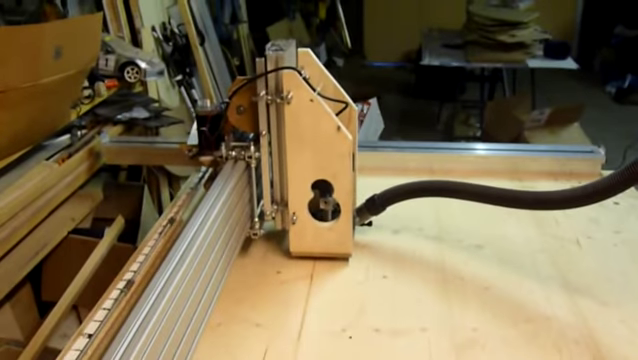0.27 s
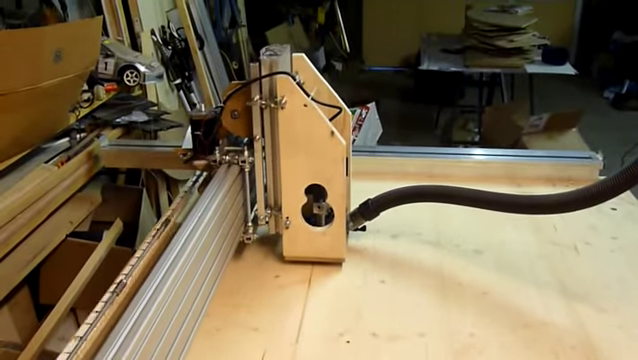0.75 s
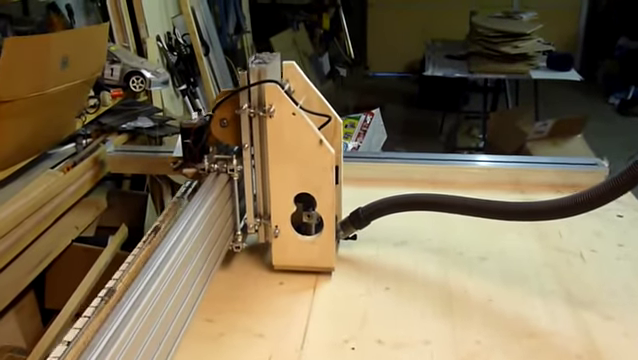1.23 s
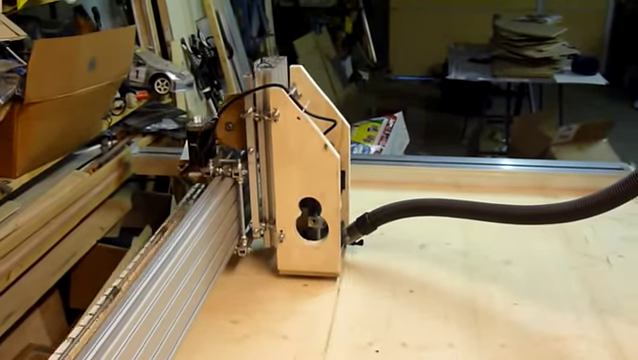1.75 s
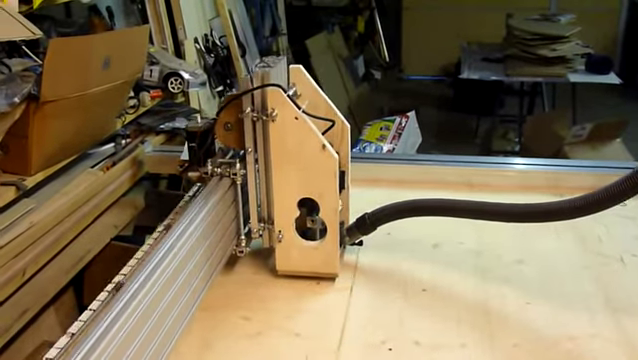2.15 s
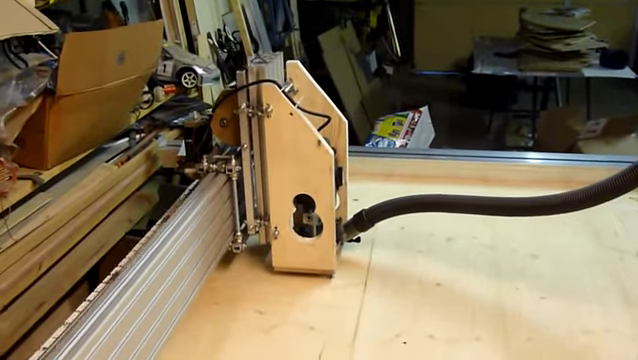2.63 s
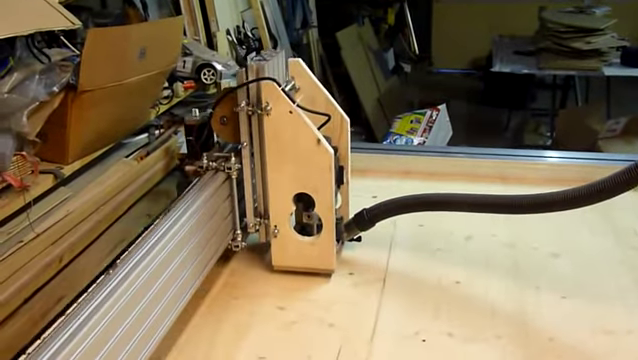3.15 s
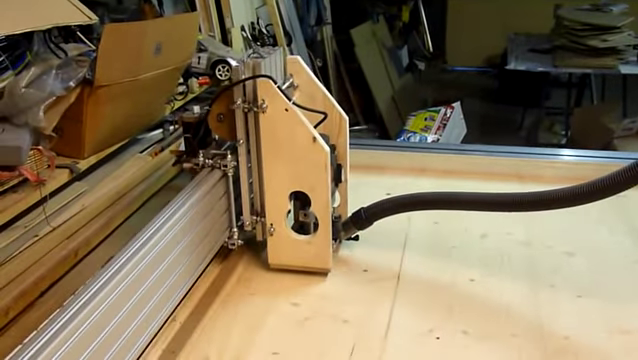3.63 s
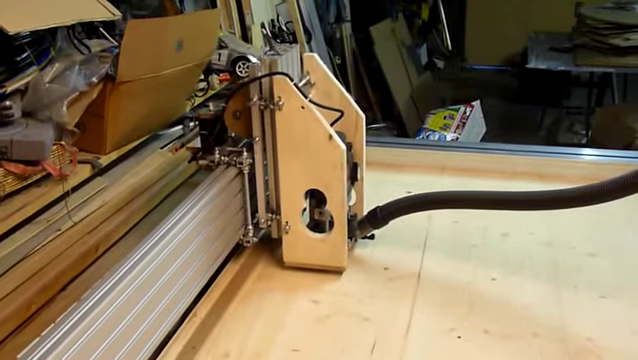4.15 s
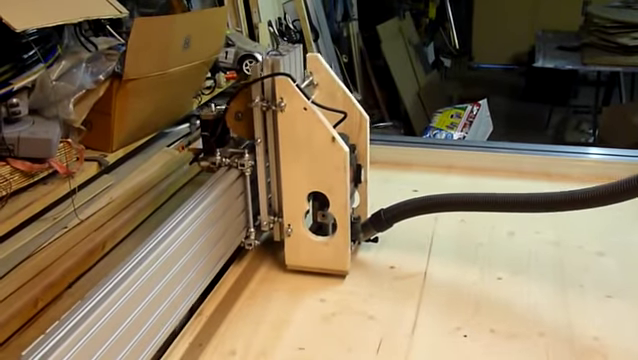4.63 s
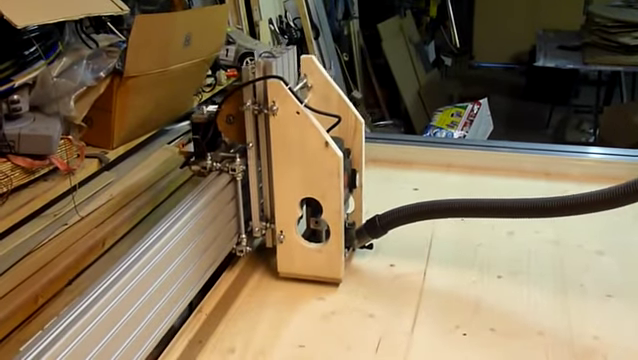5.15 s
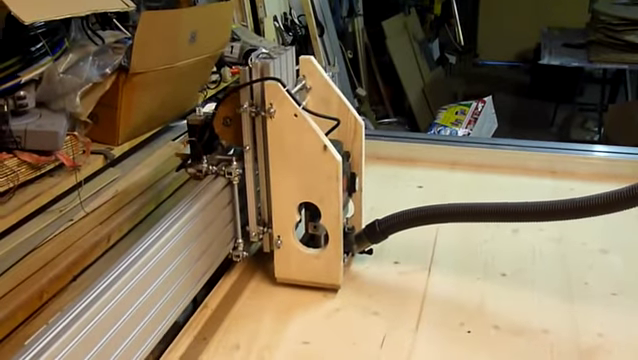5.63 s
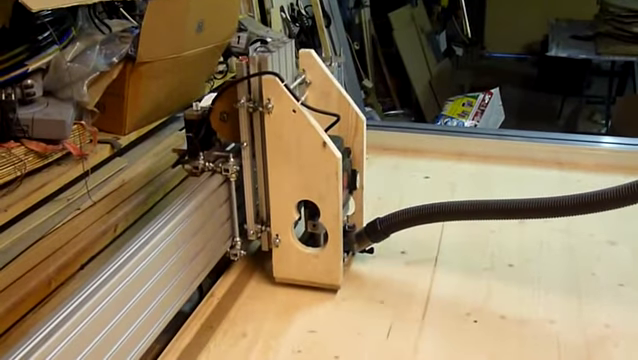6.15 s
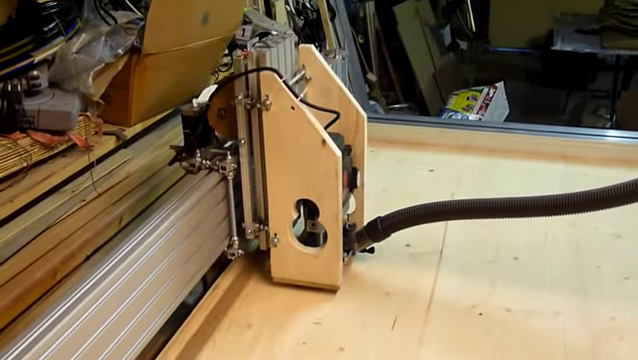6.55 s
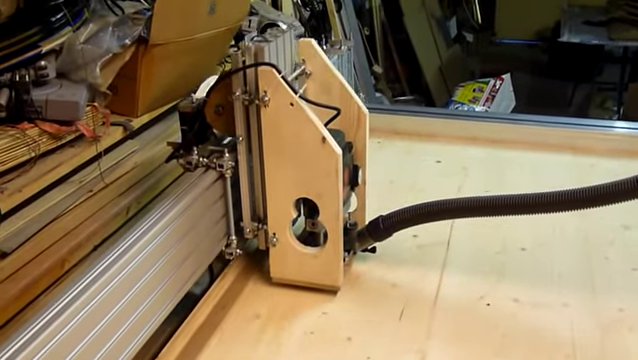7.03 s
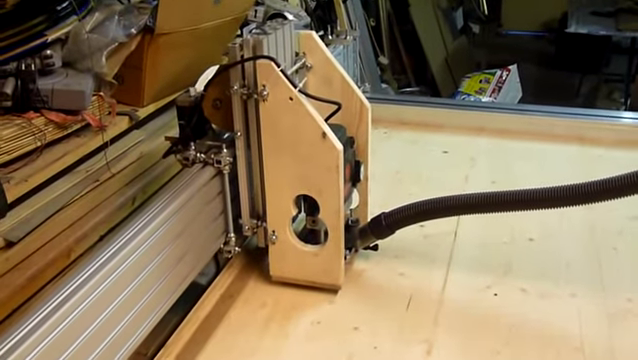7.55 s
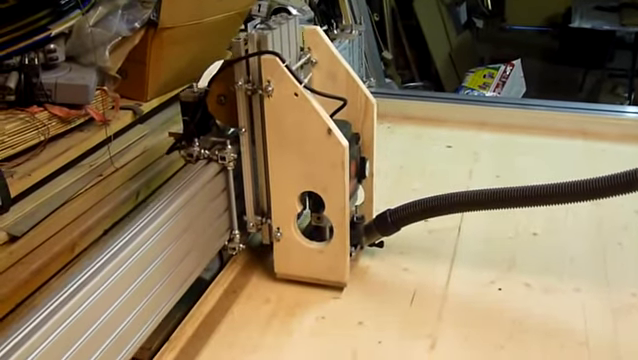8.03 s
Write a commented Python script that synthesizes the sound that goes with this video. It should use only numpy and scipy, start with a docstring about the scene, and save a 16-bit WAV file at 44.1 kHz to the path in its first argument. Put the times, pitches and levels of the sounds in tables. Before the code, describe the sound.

A close, mechanical sound from microphones riding on a wooden router machine, with only a faint workshop echo. It opens with a judder and a motor whine already slowing, sliding from about 350 Hz to a low growl by 0.5 s. The motor reverses and swoops up, shuddering the frame near 0.96 s, then holds a strong steady whine around 355 Hz until 3.7 s over grainy roller rumble and hiss. Dry hose ticks snap irregularly from 0.2 to 3.7 s. Another judder, and the pitch drops to a growl at 4.1 s. A second motor climbs, judders at 4.57 s, and holds around 377 Hz, thinner and buzzier with overtones; harder knocks land near 4.6, 5.3, 5.5, 6.8 and 7.4 s. It judders and slides down to 7.87 s, then the first motor rises again until the cut near 8.3 s.

```python
"""Two stepper motors take turns driving a wooden router gantry along its rails in a small workshop.
Each whine is a sine at the step rate with multiples, gliding on ramps and steady at full speed.
Rollers rumble as noise jolted once a step, the frame rings and judders, and a dragged hose ticks as noise bursts.
The microphone pair rides on the machine behind a housing that notches the treble; the room answers faintly."""
import sys
import numpy as np
from scipy import signal
from scipy.fft import rfft, irfft, next_fast_len
from scipy.io import wavfile
from scipy.ndimage import map_coordinates

SR = 44100
rng = np.random.default_rng(int(sys.argv[2]) if len(sys.argv) > 2 else 0)


def convert_level_to_amplitude(level_db):
    """Map a level in decibels to its linear amplitude factor."""
    exponent = np.asarray(level_db, float) / 20
    return 10 ** exponent


def inscribe(sig):
    """Save sig as 16-bit PCM at rate SR to the path in sys.argv[1].

    A 1-D sig is mono; a 2-D sig holds one channel per row.
    Samples are clipped to [-1, 1] before scaling.
    """
    pcm = np.round(np.clip(np.atleast_2d(sig).T, -1, 1) * 32767)
    wavfile.write(sys.argv[1], SR, pcm.astype(np.int16))


N = 365148

# moves in turn, long motor except the third: start_s, stop_s, period_change_ms_per_s (on a ramp), ramp_offset_db
MOVES = [(0, .525, 25.1, -4), (.53, 4.125, 27.1, -0.3), (4.13, 7.867, 24.4, 1.7), (7.868, 8.28, 25.5, -3.8)]
# full speed in each move: time_s, step_rate_hz, step_tone_db, drive_train_db, rattle_db
STOPPING_CRUISE = [(0, 354.5, -22.5, -41, 6), (.04, 353.4, -26.5, -47.5, 7.5)]
LONG_CRUISE = [(.974, 351.4, -17, -55, 5.2), (1.03, 352, -14, -56, -0.5), (1.6, 353.6, -14.5, -53.5, -2),
               (2.249, 355.8, -15, -54.5, -2.5), (2.67, 356.5, -18, -49, 2), (2.76, 355.1, -19, -55, 0.5),
               (3.04, 354.6, -21, -55, 4), (3.5, 354.7, -20.5, -55.5, 2.3),
               (3.674, 353.8, -23, -50.5, -1.7)]
CROSS_CRUISE = [(4.588, 374.2, -32, -38.5, -1.8), (4.831, 377.7, -29, -43.5, -1.5),
                (5.3, 377.7, -28, -44.5, -0.78), (5.49, 374.8, -29, -54, -0.053),
                (5.61, 379.6, -26, -41, 0.69), (6.021, 376, -28, -49.5, 0.1),
                (6.201, 376.7, -25.5, -40.5, 0.52), (7.397, 379.2, -26.5, -42, 0.97)]
STARTING_CRUISE = [(8.345, 354, -20, -54, 0.1), (8.4, 354, -20, -54, 0.1)]
# motor loudness on a ramp, before the move's offset:
# step_rate_hz, speeding_up_tone_db, braking_tone_db, drive_train_db
LONG_RAMP = [(65, -60, -68, -51), (81.6, -78, -71, -61.5), (101, -53, -53, -58), (127, -55.5, -58, -58.5),
             (168, -39, -43.5, -60), (212, -29, -33.5, -56), (265, -44, -30, -48.5),
             (304, -32.5, -18.5, -47.5), (330, -29.5, -18.5, -53.5)]
CROSS_RAMP = [(71.6, -72, -65, -46), (97, -86, -76, -47), (128, -61, -67, -50), (158, -62, -60, -44.5),
              (203, -58, -45, -48), (233, -34.5, -39, -37), (272, -26, -24.5, -43),
              (310, -30, -17.5, -35.5), (342, -16.5, -25, -35.5)]
# drive-train tones of gear teeth and rollers: step_rate_multiple, relative_level_db
STOPPING_GEARS = [(2, 9.5), (3, -20), (4, 6.5)]
LONG_GEARS = [(.46, 1.5), (.5, -1), (0.751, -7), (1.75, -6), (2, 5), (2.5, -13), (3, -0.5), (3.998, -9.5)]
CROSS_GEARS = [(2.935, 0), (5.87, -3), (8.8, -7)]
STARTING_GEARS = [(2, 3.5), (3, 6), (4, 3)]
# overtones of the step tone in the cross move, before the frame: step_rate_multiple, level_re_tone_db
STEP_OVERTONES = [(.5, -38.5), (1.5, -26.5), (2, -9.5), (3, -25.5), (4, -32.5), (5, -30.5), (5.5, -48),
                  (6, -34.5), (7, -44.5), (8, -40.5), (9, -39), (10, -44.5), (11, -49), (13, -47),
                  (15, -42.5)]
# high whistles at multiples of the step rate, one list a move, before the frame:
# step_rate_multiple, level_at_80_steps_per_s_db
WHISTLES = [
    [(20.5, -60), (25, -59), (35, -72)],
    [(16, -55), (34, -71), (68, -76)],
    [(32, -64), (66, -69)],
    [(24, -68), (34, -66), (67, -66)],
]
# resonances of the wooden frame: centre_hz, full_width_hz, relative_gain_db
FRAME = [(218, 44, 3.5), (245, 35, 6), (360, 82, 7.5), (536.5, 66, 3.5), (614, 84, -1.5), (838, 84, 7),
         (1066, 21, 2), (1326, 130, -2.5), (1514, 68, 6), (1820, 230, -3.5), (2430, 680, -4),
         (3860, 1300, -2)]
# judders as the step rate sweeps the frame's main resonance, weaker at reversals: time_s, relative_level_db
JUDDERS = [(0.0, 0), (0.529, -9.5), (.96, -5), (3.699, -0.5), (4.27, -11.5), (4.43, -14), (4.57, 1.5),
           (7.429, 0), (7.8, -15.5), (8.27, -9.5)]
# rolling noise spectra: frequency_hz, relative_density_db (per Hz)
BOOM = [(130, -38.5), (165, -15.5), (200, -2), (250, 6.5), (320, 11.5), (400, -3.5), (470, -17.5),
        (600, -49.5)]
ROLLERS = [(330, -33.5), (430, 0), (520, 0.5), (680, 3.5), (790, -1.5), (870, -0.5), (1000, 1), (1200, -7),
           (1500, -53)]
GRIND = [(900, -39), (1100, -2), (1400, -2.5), (1800, -5), (2200, -6.5), (2600, -8.5), (3200, -45)]
HISS = [(2300, -32.5), (2900, 3.5), (4000, -1.5), (5600, -2.5), (7000, -5), (8500, -7), (10000, -26),
        (10600, -43)]
SHUDDER = [(25, -19.5), (45, -1), (62, 0.5), (90, -6.5), (117, 0), (150, -4), (190, -40.5)]
# course of the low shudder: time_s, relative_level_db
SWAY = [(0, -63.5), (.3, -62), (.65, -69.5), (1.05, -59), (2.4, -62), (3.9, -61), (4.2, -71.5), (6.5, -67),
        (6.75, -62.5), (7.4, -59), (7.55, -68.5), (8.28, -61.5)]
# loud hose ticks: time_s, relative_level_db
TICKS = [(0.1776, -40.5), (0.2578, -46.5), (0.5718, -44.5), (0.6723, -44.5), (0.7211, -51), (0.767, -36),
         (0.8672, -39), (0.9221, -43.5), (1.0786, -45), (1.1522, -42), (1.2554, -39.5), (1.418, -45),
         (1.7643, -42.5), (1.8406, -40), (1.8905, -34.5), (2.086, -40), (2.1866, -34.5), (2.2681, -40),
         (2.3657, -33), (2.4621, -37.5), (2.5637, -45.5), (2.635, -40.5), (2.6854, -32), (2.7523, -39),
         (2.83, -35), (3.0192, -31.5), (3.224, -47.5), (3.2828, -43), (3.3374, -29.5), (3.5082, -37.5),
         (3.685, -44.5), (7.325, -40.5)]
# harder knocks against the frame, relative levels: time_s, crack_db, knock_db, thud_db
KNOCKS = [(4.572, -42.5, -32, -49), (5.2846, -42, -20.5, -44.5), (5.538, -38.5, -29.5, -25.5),
          (6.815, -36.5, -34, -32.5), (7.4122, -35.5, -22.5, -43.5)]
# spectra of crack, knock and thud: frequency_hz, relative_density_db
CRACK_COLOUR = [(2300, -9.5), (3200, 0), (4200, 0), (5600, 6), (7000, -1), (8500, -7.5), (10000, -35.5),
                (10600, -49)]
KNOCK_COLOUR = [(250, -23), (480, -4.5), (900, -14), (1300, 6.5), (1900, -11), (2800, -6.5), (4000, -31)]
THUD_COLOUR = [(200, -31), (330, -9.5), (480, 1.1), (620, -7.5), (900, -13), (1500, -41)]
# likeness of the noise at the two microphones: frequency_hz, correlation (1 = identical)
ALIKE = [(60, 1), (400, 0.99), (900, 0.94), (1400, 0.78), (2100, 0.47), (3000, 0.23), (10000, .15)]
# decay of the workshop: frequency_hz, t60_s
SHOP = [(300, 0.047), (2000, 0.54), (9000, 0.017)]
# notches of the housing: centre_hz, half_width_hz, depth_db
HOUSING = [(2555, 425, -20), (4600, 370, -19.5), (8010, 430, -11)]


def unit(x):
    """Normalisation: a signal divided by its rms has rms 1."""
    return x / np.sqrt(np.mean(x ** 2) + 1e-20)


def along(points, hz):
    """Logarithmic pitch scale: (frequency, value) points are joined linearly in log frequency."""
    f, v = np.transpose(points)
    return np.interp(np.log(hz + 1), np.log(f + 1), v)


def wobble(knots_per_s):
    """Band-limited fluctuation: a smooth curve through normal random knots."""
    knots = rng.standard_normal(int(N * knots_per_s / SR) + 4)
    return map_coordinates(knots, [np.arange(N) * knots_per_s / SR])


def filtered(x, response):
    """Linear filtering: the spectrum is multiplied by a response of frequency."""
    m = next_fast_len(N + SR // 2)
    return irfft(rfft(x, m) * response(np.fft.rfftfreq(m, 1 / SR)), m)[..., :N]


def frame_db(hz):
    """Modal resonance: each mode adds a bell-shaped power response over a weak floor."""
    modes = sum(convert_level_to_amplitude(2 * db) / (1 + (2 * (hz - centre) / width) ** 2) for centre, width, db in FRAME)
    return 10 * np.log10(0.017 + modes)


def stereo_noise(spectrum, envelope, ring=0):
    """Partial coherence: enveloped mid and side noise, coloured and scaled; ring = share of frame_db."""
    def gain(hz):
        return convert_level_to_amplitude(along(spectrum, hz) + ring * frame_db(hz))

    def mid_and_side(hz):
        angle = np.arccos(np.clip(along(ALIKE, hz), -1, 1)) / 2
        return gain(hz) * [np.cos(angle), np.sin(angle)]

    noise = rng.standard_normal((2, N))
    scale = np.std(filtered(noise[0], gain))  # gives rms 1 under a flat envelope
    mid, side = filtered(noise * envelope, mid_and_side) / scale
    return np.array([mid + side, mid - side])


def motor_move(span, cruise, ramp_law, overtones, gears, whistles, slack, flutter_db, pan_db):
    """Forced vibration at the step rate; rows: left, right, step cycle, share of full speed, rattle dB."""
    start, stop, ms_per_s, ramp_offset_db = span
    s, hz, cruise_tone_db, cruise_gear_db, rattle_db = np.transpose(cruise)
    i = slice(int(start * SR), int(stop * SR))
    t = (np.arange(N) / SR)[i]

    # kinematics: the step period grows linearly with time away from full speed
    away_s = np.maximum(np.maximum(s[0] - t, t - s[-1]), 0)
    full_rate = np.interp(t, s, hz)
    rate = 1 / (1 / full_rate + away_s * ms_per_s / 1000)
    share = rate / full_rate
    on_ramp = np.clip(away_s / 0.01, 0, 1)  # 10 ms blend from full-speed to ramp loudness

    law_hz, *law_db = np.transpose(ramp_law)
    up_db, down_db, ramp_gear_db = [ramp_offset_db + along(np.transpose([law_hz, db]), rate) for db in law_db]
    ramp_tone_db = np.where(t < s[0], up_db, down_db)
    tone_db = (1 - on_ramp) * np.interp(t, s, cruise_tone_db) + on_ramp * ramp_tone_db
    gear_db = (1 - on_ramp) * np.interp(t, s, cruise_gear_db) + on_ramp * ramp_gear_db

    slow = np.clip(np.log2(355 / rate), 0, 1)  # octaves under cruising speed, at most one
    rate = rate * (1 + (slack + .012 * slow) * wobble(30)[i])  # the load hunts more on a ramp
    phase = 2 * np.pi * np.cumsum(rate) / SR
    sound = convert_level_to_amplitude(tone_db + (.35 + 3 * slow) * wobble(40)[i]) * np.sin(phase)

    rough = np.maximum(slow, .7 * on_ramp)  # steps turn uneven as soon as the speed changes
    overtone_db = tone_db - 30 * rough  # step overtones grow near full speed
    whistle_db = -14 * np.abs(np.log2(rate / 80))  # whistles fade away from a step rate of 80 Hz
    for base_db, orders, damping_db, lumps_db in ((overtone_db, overtones, 0, 4.5),
                                                  (gear_db, gears, 30, 3.5),
                                                  (whistle_db, whistles, 0, 2)):
        for k, db in orders:
            pitch = k * rate
            flutter = flutter_db * (1 - .6 * slow) * wobble(14)[i]
            flutter = flutter + lumps_db * rough * wobble(35)[i]  # ramps are lumpy
            # uneven steps smear the high multiples
            blur = (.05 * min(k, 16) * slow + .4 * on_ramp) * wobble(90)[i]
            path_db = frame_db(pitch)
            # wood damps high gear tones, in dB an octave
            path_db = path_db - damping_db * np.log2(np.maximum(pitch / (1100 - 250 * slow), 1))
            # the small frame hardly radiates bass
            path_db = path_db + 12 * np.log2(np.minimum(pitch / 140, 1))
            tone = np.sin(k * phase + blur + rng.uniform(0, 2 * np.pi))
            sound = sound + convert_level_to_amplitude(db + base_db + path_db + flutter) * tone

    out = np.zeros((5, N))
    pan = convert_level_to_amplitude([[pan_db / 2], [-pan_db / 2]])
    out[:2, i] = np.sqrt(2) * sound * pan * signal.windows.tukey(len(t), 300 / len(t))
    out[2:, i] = np.cos(phase), share, np.interp(t, s, rattle_db)
    return out


def motors():
    """Superposition: the long motor's three moves are summed; the cross motor's is returned beside them."""
    stopping, long, cross, starting = zip(MOVES, WHISTLES)
    long_motor = (
        motor_move(stopping[0], STOPPING_CRUISE, LONG_RAMP, [], STOPPING_GEARS, stopping[1],
                   slack=.004, flutter_db=2.5, pan_db=-.4)
        + motor_move(long[0], LONG_CRUISE, LONG_RAMP, [], LONG_GEARS, long[1],
                     slack=.0015, flutter_db=3, pan_db=-.7)
        + motor_move(starting[0], STARTING_CRUISE, LONG_RAMP, [], STARTING_GEARS, starting[1],
                     slack=.004, flutter_db=2.5, pan_db=-.1))
    cross_motor = motor_move(cross[0], CROSS_CRUISE, CROSS_RAMP, STEP_OVERTONES, CROSS_GEARS, cross[1],
                             slack=.0025, flutter_db=2.2, pan_db=-.2)
    return long_motor, cross_motor


def judders():
    """Resonance build-up and decay: an exponential rise to each listed time, then free decay."""
    rise_s, t60_s = 0.029, 0.65  # rise is a time constant
    t = np.arange(N) / SR
    total = np.zeros(N)
    for s, db in JUDDERS:
        rise = np.exp(np.minimum(t - s, 0) / rise_s)
        decay = convert_level_to_amplitude(-60 * np.maximum(t - s, 0) / t60_s)
        total += convert_level_to_amplitude(db) * np.where(t < s, rise, decay)
    return total


def rolling(beat, long_share, cross_share, rattle_db):
    """Rolling contact: noise in the frame's ranges, jolted once a step, louder with speed and in a judder."""
    judder = judders()
    grow_long, grow_cross = long_share ** 2, cross_share ** 2  # the noise grows late on a ramp

    def level(crawl_db, long_db, cross_db, judder_db, steep):
        speed_db = crawl_db + grow_long * (long_db + rattle_db - crawl_db)
        speed_db = speed_db + grow_cross * (cross_db + rattle_db - crawl_db)
        return np.hypot(convert_level_to_amplitude(judder_db) * judder ** steep, convert_level_to_amplitude(speed_db))

    def jolt(depth_db):
        return unit(convert_level_to_amplitude(depth_db * beat + 1.9 * wobble(60)))

    boom = level(crawl_db=-49.5, long_db=-45, cross_db=-51.5, judder_db=-25.5, steep=1.53)
    boom = boom * stereo_noise(BOOM, unit(convert_level_to_amplitude(2.6 * wobble(25))))
    rollers = level(crawl_db=-48.5, long_db=-42.5, cross_db=-50, judder_db=-33.5, steep=1.5)
    rollers = rollers * stereo_noise(ROLLERS, jolt(1.8), ring=0.79)
    grind = level(crawl_db=-57, long_db=-48, cross_db=-53, judder_db=-41.5, steep=2)
    grind = grind * stereo_noise(GRIND, jolt(1.7), ring=0.49)
    hiss = level(crawl_db=-65.5, long_db=-56.5, cross_db=-58.5, judder_db=-51, steep=1.5)
    hiss = hiss * stereo_noise(HISS, jolt(0.92)) * convert_level_to_amplitude([[.6], [-.6]])  # 1.2 dB to the left
    sway_s, sway_db = np.transpose(SWAY)
    sway = convert_level_to_amplitude(np.interp(np.arange(N) / SR, sway_s, sway_db) + 2.5)
    return boom + rollers + grind + hiss + sway * stereo_noise(SHUDDER, 0.9)


def hose_ticks(faint_count=12):
    """Catch and release: a sharp crack, a stuttering tail, a duller knock into the wood."""
    crack_envelope = np.zeros((2, N + SR))
    wood_envelope = np.zeros((2, N + SR))  # knock, thud
    t = np.arange(SR // 8) / SR
    faint_from_s, faint_to_s, faint_db, faint_spread_db = 0.55, 3.6, -48.5, 2.5
    faint = [(faint_from_s + u * (faint_to_s - faint_from_s), faint_db + faint_spread_db * (2 * v - 1))
             for u, v in rng.uniform(size=(faint_count, 2))]
    # time, crack, knock, thud, left-right pan; a louder tick knocks louder
    events = [(s, db, -40.5 + 0.27 * (db + 40), -120, 4) for s, db in TICKS + faint]
    events += [(*row, 1.1) for row in KNOCKS]
    for s, crack_db, knock_db, thud_db, pan_db in events:
        lumps = np.repeat(rng.standard_normal(len(t) // 100 + 1), 100)[:len(t)]
        crack = 1.3 * convert_level_to_amplitude(-60 * t / 0.012) + 0.5 * convert_level_to_amplitude(3.1 * lumps) * convert_level_to_amplitude(-60 * t / 0.13)
        crack = crack * (1 - np.exp(-t / .0003))  # sharp onset, 0.3 ms
        pan = np.array([[pan_db / 2], [-pan_db / 2]])
        wood_db = np.array([[knock_db], [thud_db]])
        wood_t60_s = np.array([[0.045], [.09]])
        i = slice(round(s * SR), round(s * SR) + len(t))
        crack_envelope[:, i] += convert_level_to_amplitude(crack_db - 5.0 + pan) * crack
        wood_envelope[:, i] += convert_level_to_amplitude(wood_db - 4.5) * convert_level_to_amplitude(-60 * t / wood_t60_s)
    cracks = stereo_noise(CRACK_COLOUR, 1) * crack_envelope[:, :N]
    knocks = stereo_noise(KNOCK_COLOUR, wood_envelope[0, :N])
    return cracks + knocks + stereo_noise(THUD_COLOUR, wood_envelope[1, :N])


def workshop(x):
    """Reverberation: convolution with noise that decays by frequency, different at each ear."""
    hz, t, z = signal.stft(rng.standard_normal((2, SR // 3)), SR, nperseg=256)
    decay = convert_level_to_amplitude(-60 * t / along(SHOP, hz)[:, None])
    tail = signal.istft(z * decay, SR, nperseg=256)[1]
    return signal.fftconvolve(x, tail / np.linalg.norm(tail[0]), axes=1)[:, :N]


def scene():
    """Superposition of motor whine, rolling noise, hose ticks and the room's answer to whine and ticks."""
    long, cross = motors()
    both = long + cross
    whine, beat, rattle_db = both[:2], both[2], both[4]
    clicks = hose_ticks()
    whine = whine + convert_level_to_amplitude(-36) * workshop(whine)
    return whine + rolling(beat, long[3], cross[3], rattle_db) + clicks + convert_level_to_amplitude(-12.0) * workshop(clicks)


def housing(x):
    """Cancellation: the housing cuts narrow notches, with no phase shift."""
    def notches(hz):
        gain = np.ones_like(hz)
        for centre, width, db in HOUSING:
            offset = (hz - centre) ** 2
            gain = gain * np.sqrt((offset + (width * convert_level_to_amplitude(db)) ** 2) / (offset + width ** 2))
        return gain

    return filtered(x, notches)


def roll_off(x):
    """The treble ends steeply here."""
    return signal.sosfilt(signal.butter(12, 10630, fs=SR, output="sos"), x)


def record(dry):
    """Transmission path: the sound reaches the microphone pair through the housing."""
    mix = housing(dry)
    return roll_off(mix)


dry = scene()
out = record(dry)
inscribe(out)
```